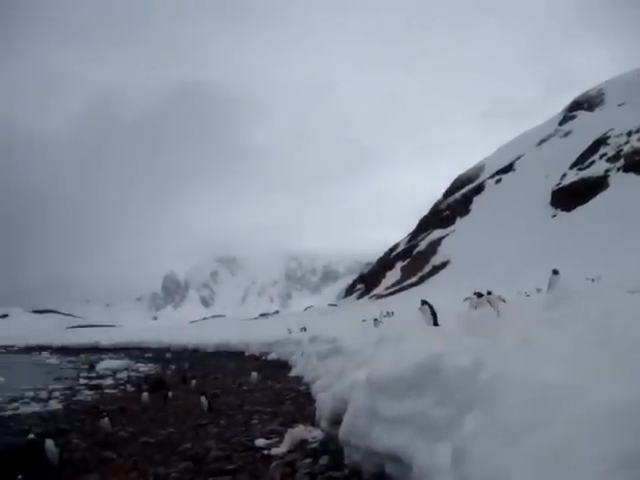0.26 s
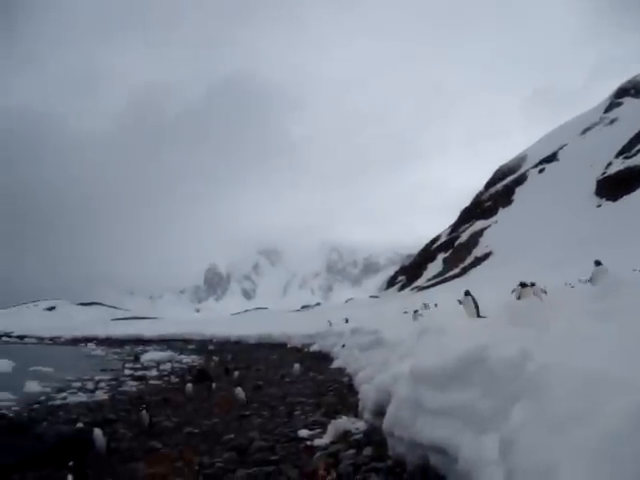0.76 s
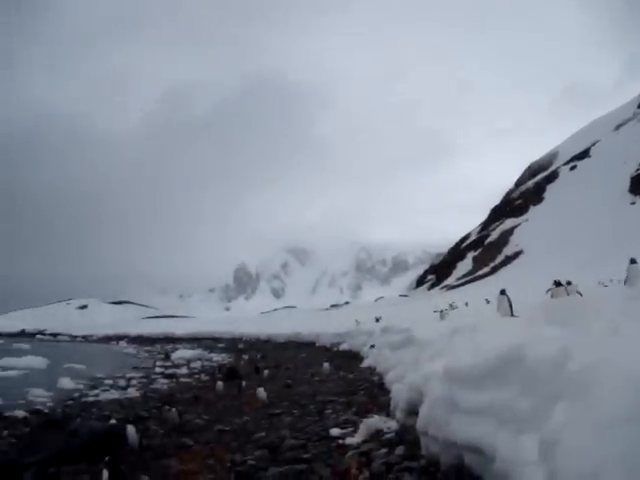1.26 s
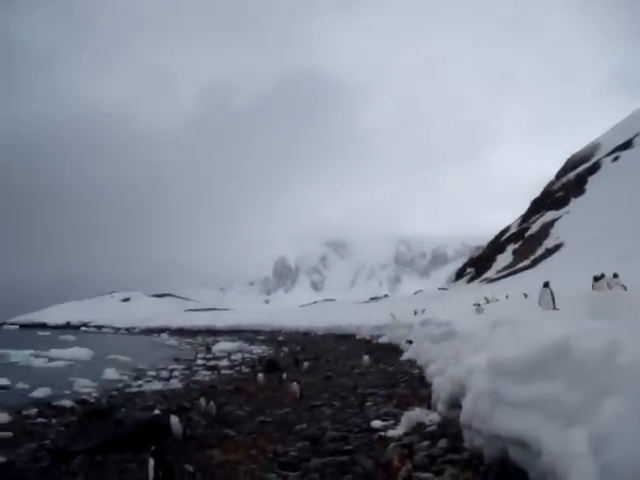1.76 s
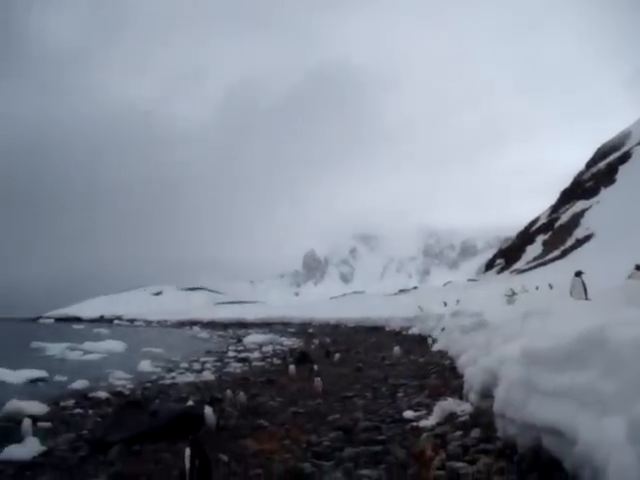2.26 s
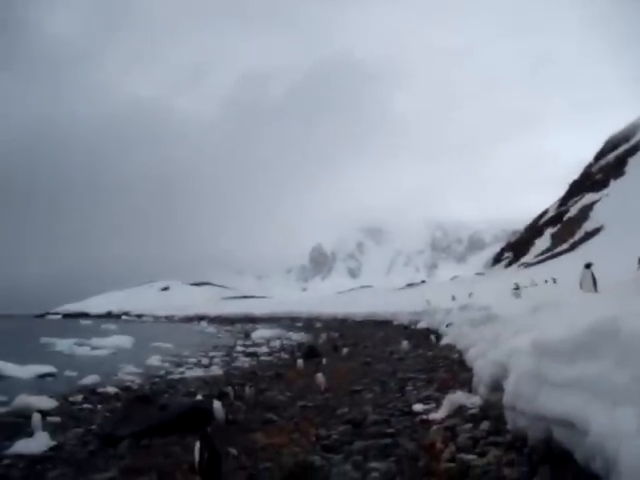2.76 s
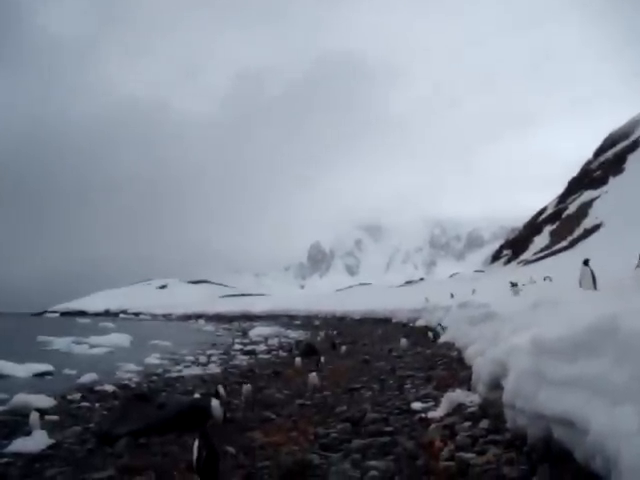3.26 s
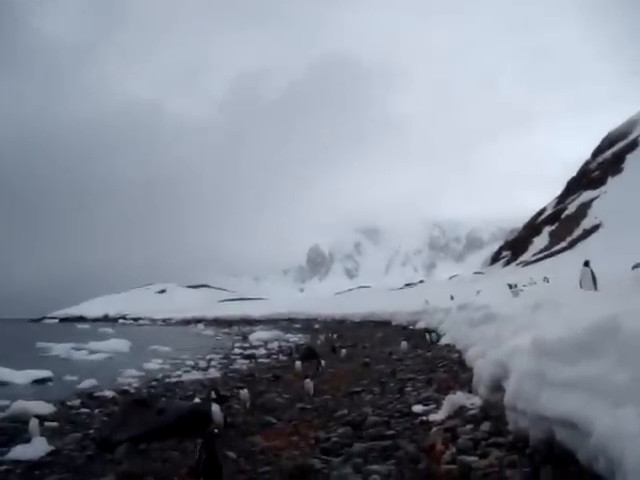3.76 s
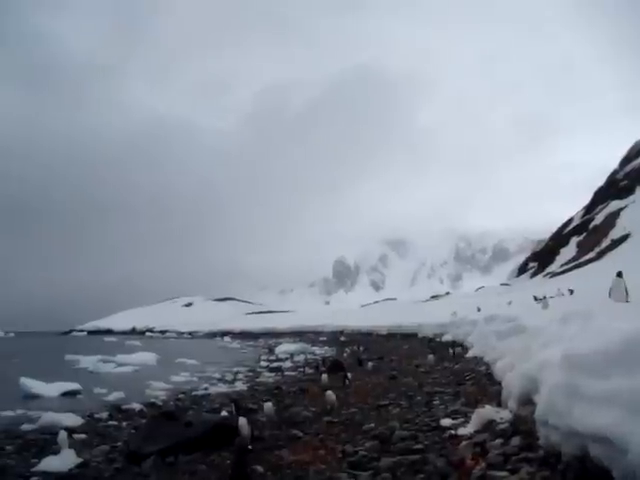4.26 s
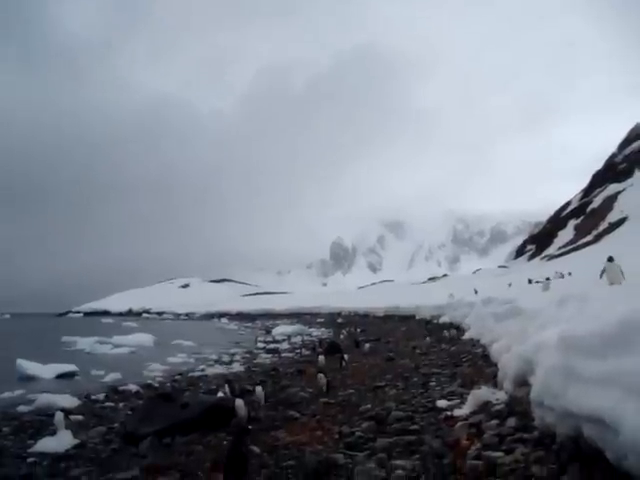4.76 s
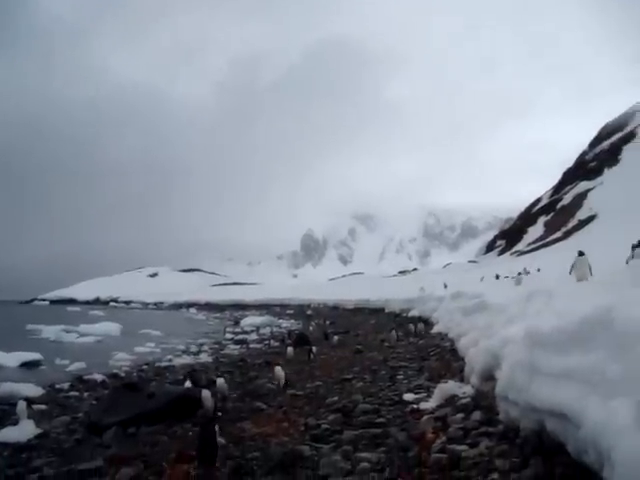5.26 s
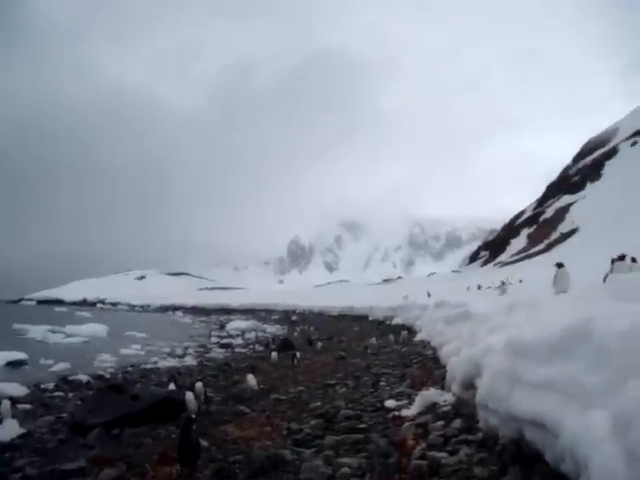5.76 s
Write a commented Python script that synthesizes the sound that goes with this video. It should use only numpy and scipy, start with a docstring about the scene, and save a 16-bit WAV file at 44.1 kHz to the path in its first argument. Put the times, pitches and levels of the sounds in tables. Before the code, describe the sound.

On an open pebble shore, soft surf laps steadily while a distant penguin gives three brief rattling brays, with two short peeps between. Stones click and scrape. A small wave then breaks, splashes and drains through the shingle, with bubbling gulps and sharp knocks. Finally a penguin close to the microphone bursts into a loud, rough, fast-pulsing bray that is still going at the end. Outdoor, no echo, slight wind rumble, dulled extreme treble.

```python
"""On a cold pebble shore, penguins give three faint rattling brays and two short peeps, then one loud bray close by.
The loud bray mixes two voices of the syrinx, the bird's voice organ: about 24 times a second a rough, higher
yelp breaks in while the low voice dips. The peeps are stacks of sine waves. Water is filtered noise with
separate drops: small waves lap, and one breaks and washes up the shingle. Stones are short ringing scrapes,
bubbles are gliding tones, and gusts are low rumbles on the microphone."""
import sys
import numpy as np
from scipy import signal
from scipy.fft import rfft, irfft
from scipy.io import wavfile
from scipy.ndimage import uniform_filter1d

SR = 44100
rng = np.random.default_rng(int(sys.argv[2]) if len(sys.argv) > 2 else 0)


def output_pcm(signal):
    """Save a mono or channel-first signal as 16-bit PCM at the path in sys.argv[1].

    Samples are clipped to [-1, 1] before scaling.
    """
    pcm = np.clip(np.atleast_2d(signal).T, -1, 1) * 32767
    wavfile.write(sys.argv[1], SR, np.round(pcm).astype(np.int16))


N = 264415
T = np.arange(N) / SR  # time of every sample, in seconds


def undb(db):
    """Turn decibels into gain."""
    return 10 ** (np.asarray(db) / 20)


def unit(x):
    """Scale to an rms (average strength) of 1."""
    return x / np.sqrt(np.mean(x ** 2) + 1e-20)


def curves(rows):
    """Join each column of a table by straight lines in time."""
    s, *columns = np.transpose(rows)
    return [np.interp(T, s, column) for column in columns]


def walk(rate):
    """Wander at random: levels held for 1 / rate seconds, smoothed twice, with a spread of 1."""
    hold = max(int(SR / rate), 1)
    steps = np.repeat(rng.standard_normal(N // hold + 1), hold)
    smooth = uniform_filter1d(uniform_filter1d(steps, hold), hold)
    return unit(smooth[:N])


def colour(x, points):
    """Filter through (Hz, dB) points without sounding early; the power gain is scaled to 1."""
    size = 4096
    hz, db = np.transpose(points)
    f = np.maximum(np.arange(size // 2 + 1) * SR / size, 1)
    gain = undb(np.interp(np.log(f), np.log(hz), db))
    # folding the cepstrum (the spectrum of the log gain) puts the response as early as it can be
    cepstrum = irfft(np.log(gain))
    cepstrum[1:size // 2] *= 2
    cepstrum[size // 2 + 1:] = 0
    response = irfft(np.exp(rfft(cepstrum)))
    return signal.fftconvolve(x, response / np.linalg.norm(response))[:N]


def band(x, hz, width_hz):
    """Ring one resonance, with gain 1 at its centre."""
    return signal.lfilter(*signal.iirpeak(hz, hz / width_hz, fs=SR), x)


def gate(centre, length, edge):
    """Open a window with soft edges, half open at the ends of its length."""
    opening = np.clip((length / 2 - abs(T - centre)) / edge + .5, 0, 1)
    return np.sin(np.pi / 2 * opening) ** 2


def add(out, at, sound):
    """Mix in a short sound at a time in seconds."""
    i = max(int(at * SR), 0)
    out[i:i + len(sound)] += sound[:N - i]


def water(drops_per_s, spread_db, drop_share, flicker_db):
    """Flat rush of countless splashes, with separate drops ringing a few cycles; each band flickers on its own."""
    out, f = np.zeros(N), np.arange(N // 2 + 1) * SR / N
    shared = walk(18)  # a flicker common to all bands
    for hz in 25 * 2 ** np.arange(0, 9.1, .5):  # bands half an octave apart
        falls = (rng.random(N) < drops_per_s / SR) * rng.choice([-1, 1], N)
        drops = falls * undb(spread_db * np.minimum(rng.exponential(size=N), 4))
        share = drop_share * min(hz / 3500, 1)  # small drops stand out most in the treble
        push = unit(rng.standard_normal(N) + share * unit(drops))
        shape = np.cos(np.pi * np.clip(np.log2((f + 1e-9) / hz), -.5, .5))
        flicker = undb(flicker_db * (walk(25.04) + 0.39 * shared))
        out += irfft(rfft(push) * shape, N) * flicker
    return out


# Tone of the surf and lapping. Each row: frequency in Hz, relative level in dB per Hz.
SHORE_COLOUR = [(15, -54), (25, -33), (220, -7), (329, -6.5), (455, -5.5), (714, -0.5), (1010, -1.5),
                (1240, 0.5), (1370, -2.5), (1590, -1.5), (1760, -1.5), (2490, -6), (3040, -8), (3630, -10),
                (9860, -19), (12800, -55), (21700, -120)]
# Loudness of the surf and lapping. Each row: time in seconds, level in dB.
LAPPING_LEVEL = [(0, -40.5), (.6, -38), (1.6, -39.5), (2.8, -37.5), (6, -35)]


def shore():
    """Distant surf and small lapping: a splashing rush that slowly changes in level."""
    level_db, = curves(LAPPING_LEVEL)
    lapping = water(drops_per_s=260, spread_db=4.5, drop_share=0.82, flicker_db=1.5)
    return unit(colour(lapping, SHORE_COLOUR)) * undb(level_db)


def syrinx(hz, jitter, shimmer_db, rasp):
    """One sharp pulse per cycle of the membrane, unsteady in pitch and strength, and a puff of noise after it."""
    phase = np.cumsum(hz * (1 + jitter * walk(300))) / SR
    cycles = np.arange(1, int(phase[-1]))
    at = np.interp(cycles, phase, np.arange(N))
    # a pulse falls between samples, so it is spread over nine of them
    taps = at.astype(int)[:, None] + np.arange(-4, 5)
    size = undb(shimmer_db * rng.standard_normal(len(at)))
    pulses = np.zeros(N)
    np.add.at(pulses, np.clip(taps, 0, N - 1), size[:, None] * np.sinc(taps - at[:, None]))
    puffs = np.exp(-(phase % 1) / 0.79) * rng.standard_normal(N)
    return unit(rasp * unit(puffs) - unit(pulses))


def yelping(rows, top_hz, sag):
    """Gain and pitch of a run of yelps; each pitch tops just before the middle and then sags."""
    gain, hz = np.zeros(N), np.full(N, float(top_hz))
    for s, db, length in rows:
        window = gate(s, length, length / 2)
        gain += undb(db) * window
        inside = window > 0
        bend = sag * ((T[inside] - s) / length + .15) ** 2
        hz[inside] = top_hz * (1 + .02 * rng.standard_normal() - bend)
    return gain, hz


YELP_SCATTER_DB = 0.3  # random spread from one yelp to the next, in both kinds of bray
FAR_ONSET_DB, FAR_ATTACK_S, FAR_FADE_DB = 6, 0.02, 4  # softer start, time to swell, fade towards the end
FAR_SLOWING_S = .0012  # each gap is this much longer than the last
# The faint brays. Each row: middle of the first yelp in seconds, length of the bray in seconds,
# level in dB before the swell and fade, length of a yelp in seconds, first gap between yelps in seconds.
FAINT_BRAYS = [(0.115, 0.37, -36.5, 0.028, 0.046), (.924, 0.37, -37.5, 0.029, 0.045),
               (1.731, 0.36, -35.5, .024, .0448)]


def far_yelps(count=12):
    """Yelps of the faint brays (s, level dB, length s): each run swells quickly, then slows and fades."""
    k, rows = np.arange(count), []
    for start, length, peak_db, yelp_s, gap_s in FAINT_BRAYS:
        ages = k * gap_s + FAR_SLOWING_S * k * (k - 1) / 2
        onset_db = FAR_ONSET_DB * np.exp(-ages / FAR_ATTACK_S)
        fade_db = FAR_FADE_DB * (ages / length) ** 4
        db = peak_db - onset_db - fade_db + YELP_SCATTER_DB * rng.standard_normal(count)
        rows += [(start + age, level, yelp_s) for age, level in zip(ages, db) if age < length]
    return rows


def far_brays(low_hz=240, low_db=-11):
    """A bird further off: its yelps carry, with only a soft low hum under them."""
    gain, hz = yelping(far_yelps(), top_hz=345.0, sag=0.24)
    throat = [(200, -44), (340, -23), (600, -23), (1000, -18.0), (1330, 0), (1720, 2.5),
              (2100, 0), (2600, -8), (4400, -12), (6000, -28), (10000, -35)]  # (Hz, dB)
    high = colour(syrinx(hz, jitter=.01, shimmer_db=1.8, rasp=.15), throat)
    low = syrinx(np.full(N, low_hz), jitter=.08, shimmer_db=4.0, rasp=0.7)
    hum = unit(band(band(low, low_hz, 100), low_hz, 100))
    hum_gain = undb(low_db) * uniform_filter1d(gain, int(.06 * SR))  # smooths over the single yelps
    return gain * high + hum_gain * hum


# Air pockets gulping in the water. Each row: start in seconds, peak level in dB, starting pitch in Hz.
AIR_POCKETS = [(0.156, -41, 235), (2.39, -39, 290), (2.435, -39.5, 310), (3.415, -32, 313),
               (3.545, -34, 296), (4.316, -33, 376), (4.696, -33, 291)]


def gulps(rise_s=0.012, glide=3.8):
    """Large bubbles swell, ring and rise in pitch as they near the surface."""
    out, t = np.zeros(N), T[:SR // 6]
    for s, db, hz in AIR_POCKETS:
        swell = (t / rise_s * np.exp(1 - t / rise_s)) ** 2
        ring = np.sin(2 * np.pi * hz * t * (1 + glide * t / 2))
        add(out, s, undb(db) * swell * ring)
    return out


# Stones knocking and shifting. Each row: start in seconds, peak level in dB, centre of the resonance in Hz,
# width of its narrower filter in Hz, time in seconds for the scrape to die by 60 dB.
KNOCKS = [(0.348, -25.5, 8300, 2500, .005), (.545, -19, 2600, 3200, 0.016), (0.689, -24, 2630, 260, 0.11),
          (0.693, -21, 3370, 900, 0.082), (1.483, -30, 1860, 200, 0.032), (2.263, -24, 750, 400, 0.048),
          (2.299, -22.5, 900, 800, 0.15), (2.315, -18.5, 1190, 2040, 0.03),
          (2.342, -17.5, 3200, 3000, 0.0047), (3.973, -17.5, 1600, 900, 0.024),
          (4.296, -15.5, 1900, 1200, 0.027), (4.508, -14, 1550, 1200, 0.018)]


def stones():
    """Each knock is a hard contact and a brief dying scrape in the stone's resonance."""
    out, t = np.zeros(N), T[:SR // 8]
    for s, db, hz, width_hz, t60 in KNOCKS:
        push = rng.standard_normal(len(t)) * np.exp(-np.log(1000) * t / t60)
        push[0] += 4  # the hard contact
        knock = band(band(push, hz, width_hz), hz, 2 * width_hz)
        add(out, s, undb(db) * knock / abs(knock).max())
    return out


# Level in dB of each partial (each sine wave in a peep), from the fundamental upwards.
PARTIAL_LEVELS = [-24, -4.5, -15, -17, -18.5, -36]
# The peeps. Each row: start in seconds, length in seconds, starting, middle and closing pitch in Hz,
# level in dB about which it wavers, change of the high partials in mid-call in dB.
PEEP_CALLS = [(0.651, 0.14, 614, 641, 601, -36.5, 4), (1.481, 0.12, 612, 620, 611, -36.5, -4)]


def peeps():
    """Short clear calls on an arched pitch, second partial strongest; the bill brightens or dulls mid-call."""
    out = np.zeros(N)
    for s, length, start_hz, top_hz, end_hz, db, lift_db in PEEP_CALLS:
        progress = np.clip((T - s) / length, 0, 1)
        arch = np.polyfit([0, .5, 1], [start_hz, top_hz, end_hz], 2)
        hz = np.polyval(arch, progress) * (1 + .003 * walk(150))
        phase = 2 * np.pi * np.cumsum(hz) / SR
        bill = undb(lift_db * np.sin(np.pi * progress))
        tone = np.zeros(N)
        for k, partial_db in enumerate(PARTIAL_LEVELS):
            partial = undb(partial_db) * np.sin((k + 1) * phase)
            tone += partial * (bill if k > 2 else 1)  # from the fourth partial upwards
        level = undb(db + 0.88 * walk(88.0))
        out += unit(tone) * level * gate(s + length / 2, length, 0.0081)
    return out


# Puffs of wind on the microphone. Each row: middle in seconds, level in dB, length in seconds.
WIND_PUFFS = [(1.197, -46, 0.068), (2.43, -48.5, 0.27)]


def gusts():
    """Puffs of wind rumble on the microphone: low noise that swells and falls."""
    tone = [(25, -28), (50, -21), (78, -3), (150, -3.0), (280, 4.5), (500, -4), (2000, -75)]  # (Hz, dB)
    rumble = colour(rng.standard_normal(N), tone)
    return rumble * sum(undb(db) * gate(s, length, length / 2) for s, db, length in WIND_PUFFS)


SPRAY_LEAD = 1.18  # the spray builds over this many times the body's rise, so it starts to swell earlier
# Surges of water up the shingle, long waves and short splashes. Each row: crest in seconds, rise in seconds,
# fall in dB per second, body level in dB before wave() lifts it, average spray level in dB.
WATER_SURGES = [(3.25, 0.083, 38, -36.5, -60), (3.52, 0.37, 8, -30, -32.5), (3.659, 0.084, 93, -33, -34.5),
                (3.82, .025, 72, -34, -35), (4, 0.028, 57, -37.5, -35), (4.53, 0.26, 8.5, -35, -39.5),
                (5.45, 0.34, 19, -36, -42)]


def surging():
    """Gains of the water's body and spray: each surge swells to a crest and drains away; their powers add."""
    body, spray = 0, 0
    for crest, rise_s, fall_db_per_s, body_db, spray_db in WATER_SURGES:
        ahead = np.maximum(crest - T, 0) / rise_s
        drained_db = fall_db_per_s * np.maximum(T - crest, 0)
        body = body + (np.exp(-ahead ** 2) * undb(body_db - drained_db)) ** 2
        spray = spray + (np.exp(-(ahead / SPRAY_LEAD) ** 2) * undb(spray_db - drained_db)) ** 2
    return np.sqrt(body), np.sqrt(spray)


# Tone of the breaking wave. Each row: frequency in Hz, relative level in dB per Hz before body and spray are split.
WASH_COLOUR = [(59, -69), (100, -31), (216, -14.5), (317, -2.5), (406, -3.5), (502, -10.5), (620, -9),
               (827, -7), (946, -1.5), (1240, 1.5), (3110, -3), (5650, -10), (9310, -13.5), (9860, -13),
               (12800, -71), (21700, -120)]


def wave(spray_hz=4200, body_db=2.5, surge_db=0.96):
    """A wave breaks with bright, wavering spray, then drains through the pebbles; the last surges are duller."""
    body, spray = surging()
    rush = colour(water(drops_per_s=500, spread_db=4.5, drop_share=0.78, flicker_db=0.76), WASH_COLOUR)
    low = signal.sosfilt(signal.butter(3, spray_hz, "low", fs=SR, output="sos"), rush)
    high = signal.sosfilt(signal.butter(3, spray_hz, "high", fs=SR, output="sos"), rush)
    return unit(low) * body * undb(body_db) + unit(high) * spray * undb(surge_db * walk(35))


FIRST_YELP_S, YELP_PERIOD_S = 5.172, .04085
DRONE_DB, YELP_DB = -22.5, -20.5  # levels of low voice and yelps at 0 dB effort
YELP_EFFORT_SHARE = 0.66  # the yelps follow the effort only in part
# The loud bray. Each row: time in seconds, pitch of the low voice in Hz before each yelp bends it, effort in dB.
LOUD_BRAY = [(5.139, 266.4, -22), (5.224, 276.2, -7), (5.309, 281.5, -1.5), (5.419, 287.3, 0.5),
             (5.681, 296, 1), (6, 289.6, -3)]


def near_yelps():
    """Yelps of the loud bray (s, level dB): an even beat whose strength follows the effort."""
    s, _, effort_db = np.transpose(LOUD_BRAY)
    times = np.arange(FIRST_YELP_S, T[-1], YELP_PERIOD_S)
    db = YELP_DB + YELP_EFFORT_SHARE * np.interp(times, s, effort_db)
    db = db + YELP_SCATTER_DB * rng.standard_normal(len(times))
    return list(zip(times, db))


# Throat colour of the low voice. Each row: frequency in Hz, relative level in dB.
LOW_THROAT = [(150, -46), (295, -13.5), (520, -22.5), (860, -9.5), (1010, -1), (1160, 3), (1400, -11),
              (1750, -7.5), (2060, -3.5), (2400, -17), (3200, -13.5), (4900, -20), (6300, -61),
              (10000, -50)]
# Throat colour of the yelps, with the bill wider. Each row: frequency in Hz, relative level in dB.
HIGH_THROAT = [(150, -55), (330, -15.5), (520, -19.5), (760, -5.5), (1150, 4), (1450, -6), (1800, 1),
               (2150, -4), (2420, -6), (3200, -3.5), (4200, -10.5), (5200, -13), (6400, -32.5),
               (10000, -24)]


def near_bray(yelp_s=.014, squeeze_s=0.019, squeeze_lead_s=0.0092, squeeze_hz=1720, squeeze_db=-1.5,
              duck=0.72, slip=.09, scoop=0.014, edge_db=-1):
    """Each syllable starts squeezed and nasal, bursts open into a rough yelp, then drops back to the low voice."""
    yelps = near_yelps()
    gain, yelp_hz = yelping([(s, db, yelp_s) for s, db in yelps], top_hz=366.8, sag=.1)
    squeeze = sum(undb(db) * gate(s - squeeze_lead_s, squeeze_s, 0.029) for s, db in yelps)
    broken = np.clip(sum(gate(s - .003, 0.017, 0.011) for s, _ in yelps), 0, 1)
    pressed = sum(gate(s + 0.0085, .013, 0.0098) for s, _ in yelps)
    hz, effort_db = curves(LOUD_BRAY)
    # the low voice is pulled sharp and weakens while the high one breaks in, then scoops up from below
    low_hz = hz * (1 + slip * broken - scoop * pressed)
    pulses = syrinx(low_hz, jitter=0.0059, shimmer_db=0.0, rasp=0.24) * (1 - duck * broken)
    # it comes back hard, with a bright edge that soon softens
    edge = signal.sosfilt(signal.butter(1, 3000, "high", fs=SR, output="sos"), pulses)
    low = colour(pulses + undb(edge_db) * pressed * edge, LOW_THROAT)
    low = low * undb(DRONE_DB + effort_db) * (T > LOUD_BRAY[0][0])
    high = syrinx(yelp_hz, jitter=0.03213, shimmer_db=0.5, rasp=0.59)
    nasal = unit(band(band(high, squeeze_hz, 1000), squeeze_hz, 1100))
    return low + colour(gain * high, HIGH_THROAT) + undb(squeeze_db) * squeeze * nasal


def scene():
    """Birds, stones, wind and water in the open air, with no echo."""
    water_sounds = shore() + gulps() + wave()
    birds = far_brays() + peeps() + near_bray()
    return (water_sounds + birds + stones() + gusts())[None]


def record(dry):
    """Cut the top of the treble steeply, above 10050 Hz."""
    return signal.sosfilt(signal.ellip(12, .2, 80, 10050, fs=SR, output="sos"), dry)


dry = scene()
out = record(dry)
output_pcm(out)
```